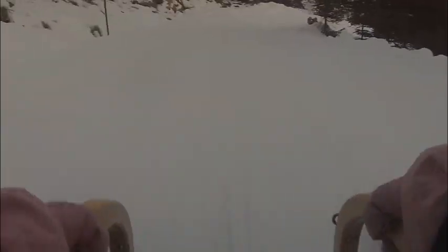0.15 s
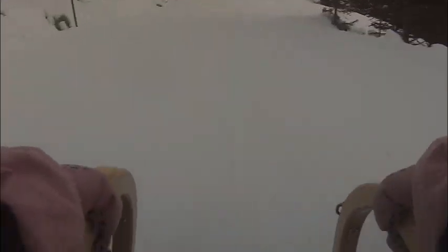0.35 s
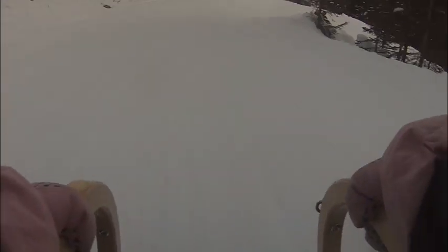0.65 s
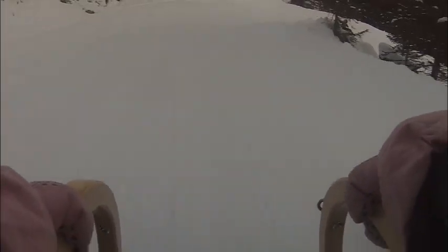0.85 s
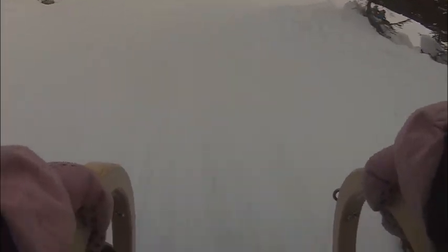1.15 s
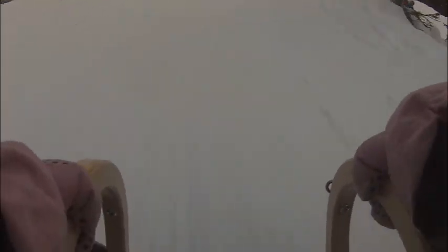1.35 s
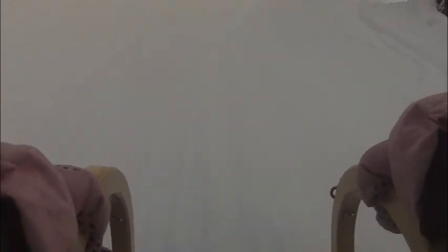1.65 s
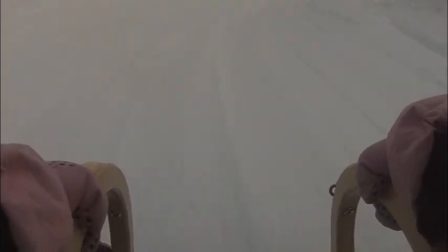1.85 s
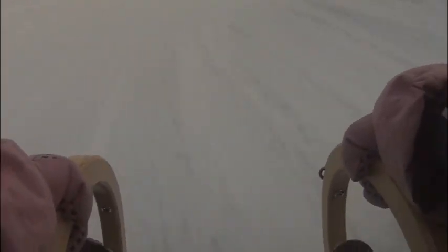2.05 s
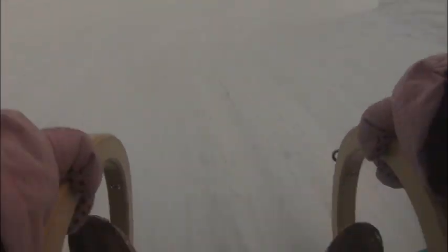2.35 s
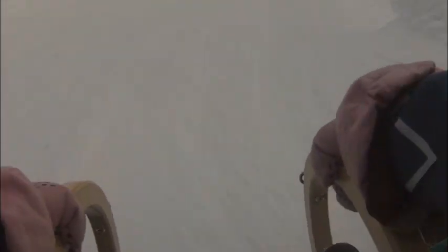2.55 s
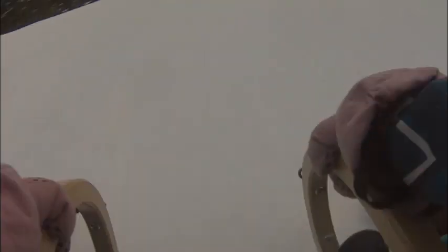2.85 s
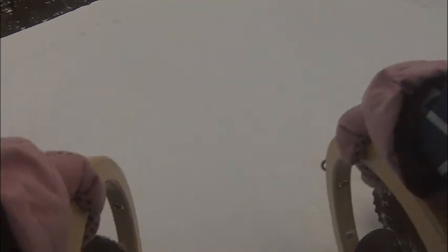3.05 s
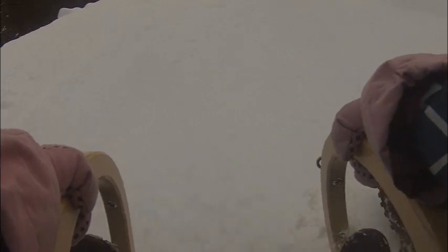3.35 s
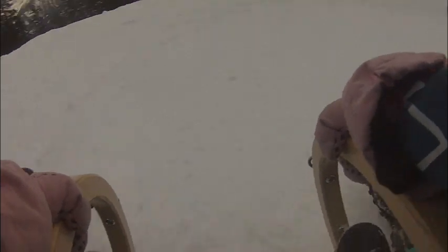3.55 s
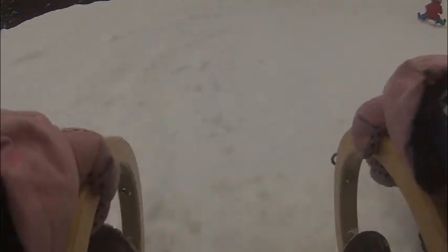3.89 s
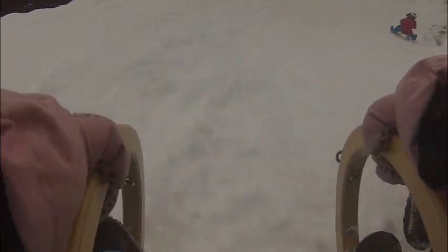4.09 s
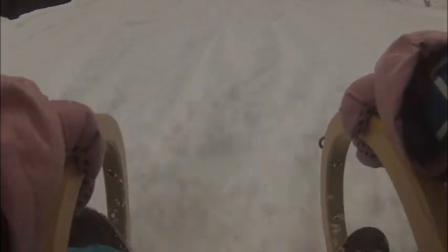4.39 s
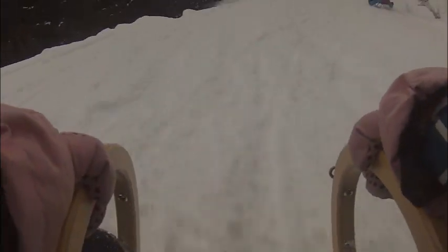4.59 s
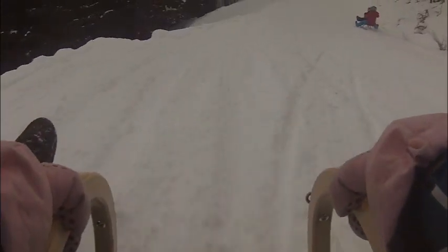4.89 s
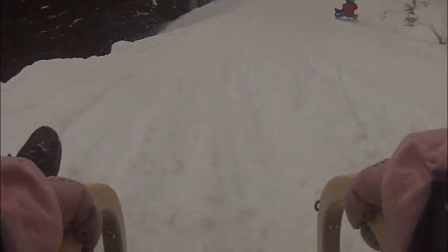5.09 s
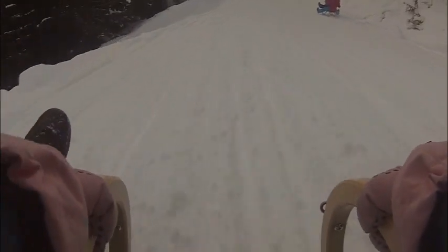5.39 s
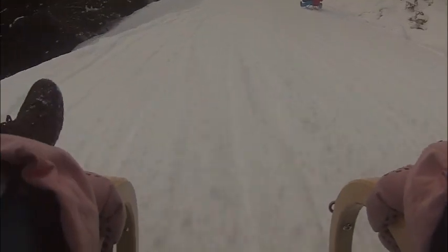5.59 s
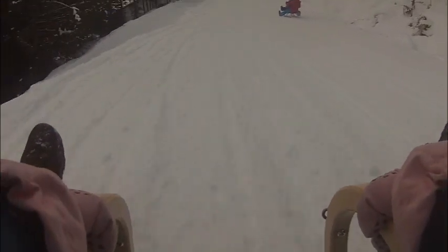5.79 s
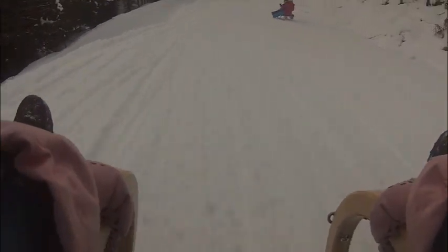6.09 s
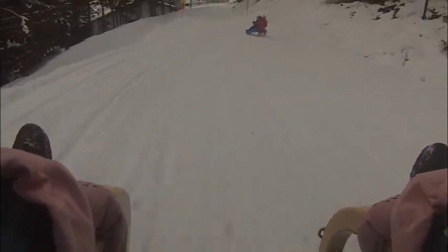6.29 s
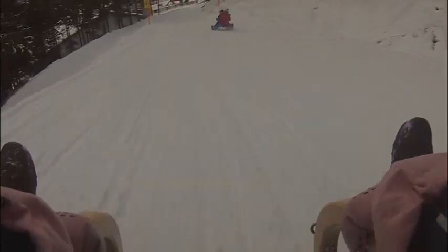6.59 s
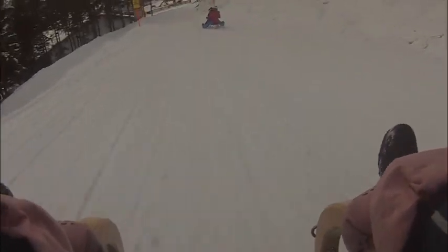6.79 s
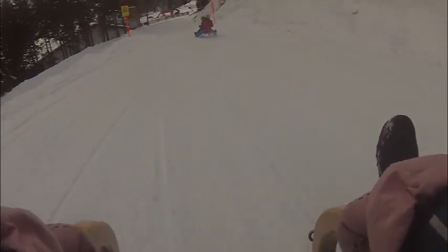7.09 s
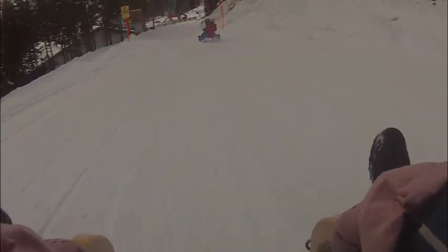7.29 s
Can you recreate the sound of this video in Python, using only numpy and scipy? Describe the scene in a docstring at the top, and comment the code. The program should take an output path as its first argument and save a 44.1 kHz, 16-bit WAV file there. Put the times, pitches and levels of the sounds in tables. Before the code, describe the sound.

Sled runners scrape over firm snow with thumps, short skids and crumbs ticking on a camera case, over low wind buffeting and rumble.

```python
"""On a packed-snow slope, a wooden sled runs downhill with a cased camera and its microphone riding on it.
The runners hiss and grind as filtered noise and breaking grains, harder through a turn, with short skids.
Bumps thump the frame as decaying swings and knock the camera mount; the wood clacks softly.
Crumbs of snow tick on the case as short blows; its resonances colour everything.
Behind them lie the frame's rumble, gusty wind on the microphone and a thin hiss of the microphone."""
import sys
import numpy as np
from scipy import signal
from scipy.fft import rfft, irfft, next_fast_len
from scipy.io import wavfile
from scipy.ndimage import uniform_filter1d, map_coordinates

SR = 44100
rng = np.random.default_rng(int(sys.argv[2]) if len(sys.argv) > 2 else 0)


def waveform_to_disk(signal):
    """Save audio, clipped to [-1, 1], as 16-bit WAV at the path in sys.argv[1]."""
    frames = np.transpose(np.atleast_2d(signal))
    scaled = np.clip(frames, -1, 1) * 32767
    samples = np.round(scaled).astype(np.int16)
    wavfile.write(sys.argv[1], SR, samples)


N = 328104


def amp(db):
    """Decibels to gain."""
    return 10 ** (np.asarray(db) / 20)


def unit(x):
    """Scale to rms 1."""
    return x / np.sqrt(np.mean(x ** 2) + 1e-20)


def clock():
    """Time of every sample, in seconds."""
    return np.arange(N) / SR


def curves(rows):
    """One value per sample for each column after the time."""
    times, *columns = np.transpose(rows)
    return [np.interp(clock(), times, column) for column in columns]


def wobble(rate):
    """A smooth random curve, rate knots a second."""
    knots = rng.standard_normal(int(N * rate / SR) + 4)
    return map_coordinates(knots, [np.arange(N) * rate / SR])


def add(track, start_s, sound):
    """Mix a sound into the track at its start time."""
    room = track[max(0, round(start_s * SR)):][:len(sound)]
    room += sound[:len(room)]


# resonances and notches of the camera case: centre_hz, width_hz, lift_db
CASE_MODES = [(708, 91, 3), (1100, 720, 1.5), (1515, 165, 5.5), (1674, 51, -9), (2050, 480, 2.5),
              (2250, 214, 2.5), (2635, 430, 2), (3770, 150, -4), (4240, 160, 4), (5500, 1140, 7.5),
              (8250, 570, -3.5), (9840, 600, 2.5)]


def response(spectrum, size=16384):
    """Minimum-phase impulse response, peak 1, of a source spectrum heard through the case."""
    hz = np.fft.rfftfreq(size, 1 / SR)
    freq_hz, level_db = np.transpose(spectrum)
    db = np.interp(np.log(hz + 1), np.log(freq_hz + 1), level_db)
    for centre, width, lift in CASE_MODES:
        db = db + lift / (1 + (2 * (hz - centre) / width) ** 2)
    # fold the cepstrum forward in time, so nothing sounds before its cause
    cepstrum = irfft(np.log(amp(db)))
    cepstrum[1:size // 2] *= 2
    cepstrum[size // 2 + 1:] = 0
    impulse = irfft(np.exp(rfft(cepstrum)))
    return impulse / np.abs(impulse).max()


def through(x, spectrum):
    """Colour an excitation with a source spectrum and the case."""
    return signal.fftconvolve(x, response(spectrum))[:N]


def case_ring(x, share, t60):
    """The case and its mount ring on faintly in many close modes: a decaying noise tail."""
    t = np.arange(SR // 8) / SR
    decay = amp(-60 * t / t60) * (1 - np.exp(-t / 0.001))
    tail = rng.standard_normal(len(t)) * decay
    return x + share * signal.fftconvolve(x, tail / np.linalg.norm(tail))[:N]


def crunch(rate, spread_db):
    """Snow grains breaking, rate a second, of widely scattered size; rms 1."""
    breaks = rng.random(N) < rate / SR
    sizes = rng.standard_normal(N) * amp(spread_db * rng.standard_normal(N))
    return unit(breaks * sizes)


def patchy(x, depth_db):
    """Let the colour shimmer in patches about 170 Hz wide and 35 ms long."""
    z = signal.stft(x, nperseg=1024)[2]
    field = uniform_filter1d(rng.standard_normal(z.shape), size=4, axis=0)
    field = uniform_filter1d(field, size=3, axis=1)
    return signal.istft(z * amp(depth_db * unit(field)), nperseg=1024)[1][:N]


def contacts(events, spectrum, chatter, t60, rise_s):
    """Sharp blows, each followed by a short chatter of the touching surfaces."""
    force, t = np.zeros(N), np.arange(SR // 20) / SR
    envelope = amp(-60 * t / t60) * (1 - np.exp(-t / rise_s))
    for start_s, db in events:
        blow = chatter * rng.standard_normal(len(t)) * envelope
        blow[0] += 1
        add(force, start_s, amp(db) * blow)
    return through(force, spectrum)


# brief dips in the hiss: start_s (the middle of each dip)
HISS_DIPS = [.814, 1.071, 4.67, 4.76, 5.003, 5.11, 5.405, 5.503, 5.705, 5.88, 6.228, 6.256, 6.575]
DIP_DB, DIP_HALF_S = 9, 0.01


def dips():
    """Depth in dB of the brief, flat-bottomed dips in the hiss."""
    t = clock()
    return DIP_DB * sum(np.exp(-((t - s) / DIP_HALF_S) ** 4) for s in HISS_DIPS)


# how hard the runners bite: start_s, grind_db, spray_db (both before the trims below)
RUNNER_BITE = [(0.0, -45, -55.5), (0.14, -52, -60), (0.85, -54.5, -60.5), (1.14, -53, -61),
               (1.95, -51.5, -55), (2.15, -45, -49), (2.61, -50, -59), (2.78, -43.5, -47),
               (2.92, -41.5, -48.5), (3.44, -47, -49), (3.75, -47.5, -51.5), (4.08, -52.5, -55),
               (4.41, -50.5, -56), (4.81, -59.5, -61), (5.06, -58.5, -62.5), (5.34, -50, -59),
               (5.78, -61.5, -64), (6.07, -58.5, -60.5), (6.32, -56, -62), (7.44, -58.5, -66)]
# colour of the grinding, before the case: freq_hz, level_db (relative)
GRIND_COLOUR = [(100, -13.5), (290, 2), (420, -4), (600, -6.5), (1100, -7.5), (2100, 2.5), (3000, -2),
                (3600, -16), (5000, -15.5), (9000, -25), (16000, -53)]
# colour of the fine spray, before the case: freq_hz, level_db (relative)
SPRAY_COLOUR = [(1000, -47), (3000, 2), (4500, 0.5), (6500, -2.5), (8200, -3), (10500, -6.5), (13000, -13),
                (15500, -20.5)]
GRIND_TRIM_DB, SPRAY_TRIM_DB = 0.5, 0.5
SKID_SPRAY_DB = 2  # a skid throws up this much more spray


def runners():
    """The runners crush grains and throw a fine spray; their pressure flutters with the uneven snow."""
    grind_db, spray_db = curves(RUNNER_BITE)
    t = clock()
    skidding = sum(np.exp(-((t - s) / half_s) ** 2) for s, _, half_s in SKIDS)
    pressure_db = 0.95 * wobble(18) + 0.76 * wobble(70)

    grains = rng.standard_normal(N) + 0.8 * crunch(rate=1500, spread_db=3.5)
    grains = grains * amp(pressure_db + 1.14 * wobble(45))
    grind = unit(through(patchy(grains, depth_db=2.5), GRIND_COLOUR))
    grind = case_ring(amp(grind_db + GRIND_TRIM_DB) * grind, share=0.31, t60=0.096)

    crystals = rng.standard_normal(N) + 0.45 * crunch(rate=3000, spread_db=3.5)
    powder = crystals * amp(pressure_db + 0.81 * wobble(25))
    spray = unit(through(patchy(powder, depth_db=3.0), SPRAY_COLOUR))
    spray = amp(spray_db + SPRAY_TRIM_DB + SKID_SPRAY_DB * skidding) * spray

    dip_db = dips()
    return grind * amp(-0.35 * dip_db) + spray * amp(-dip_db)  # the grinding dips less


# colour of the churned snow, before the case: freq_hz, level_db (relative)
PLOUGH_COLOUR = [(100, -18.5), (250, -2), (420, -1), (600, -5), (950, -7.5), (1200, -16.5), (3000, -31.5)]
PLOUGH_DB = -5  # against the untrimmed spray


def ploughing():
    """Cutting deeper, the runners churn the snow aside: a dull rush that rises with the spray."""
    _, spray_db = curves(RUNNER_BITE)
    rush_db = spray_db + PLOUGH_DB + 2.6 * wobble(30) - dips()
    return amp(rush_db) * unit(through(rng.standard_normal(N), PLOUGH_COLOUR))


# the runners skid over rough patches: start_s (the middle), level_db (before the ring), half_length_s
SKIDS = [(0.27, -54, 0.093), (0.458, -49, 0.03), (1.978, -46.5, 0.036), (2.4, -43, 0.036),
         (2.753, -37, 0.0067), (3.657, -43.5, 0.044), (3.898, -46, .04), (5.317, -46.5, 0.019),
         (5.457, -43, 0.043), (5.753, -54.5, 0.1), (6.131, -51, 0.05), (6.444, -48, 0.013),
         (6.602, -48, 0.016), (6.977, -49, 0.07)]
# colour of snow hitting or scraping, before the case: freq_hz, level_db (relative)
TICK_COLOUR = [(200, -8), (1000, -14.5), (1700, 0), (2300, 9), (3200, -7.5), (4500, -15), (8500, -20),
               (12500, -24.5), (15000, -31)]


def scrapes():
    """A skid is a short swell of coarser grains, ringing on in the case."""
    t = clock()
    swell = sum(amp(db) * np.exp(-((t - s) / half_s) ** 2) for s, db, half_s in SKIDS)
    grains = unit(through(crunch(rate=3400, spread_db=5.5), TICK_COLOUR))
    return case_ring(swell * grains, share=0.25, t60=0.1)


# bumps in the track: start_s, thump_db (before the attack), pitch_hz, knock_db (before the mount's level)
TRACK_BUMPS = [(0.045, -22, 87, -45), (0.087, -26.5, 153, -45), (.114, -21, 123, -27), (.224, -28, 67, -38),
               (2.499, -23, 140, -44), (2.638, -18.5, 142.4, -26), (2.846, -24, 113, -39),
               (2.9187, -11, 92.5, -5), (2.942, -16, 110, -42), (2.961, -4, 125, -2),
               (2.9733, -11, 201, -26), (3.083, -18, 125, -9.5), (3.2243, -23.5, 194, -22.5),
               (3.631, -20, 105, -42), (3.801, -28, 169, -40), (3.887, -18.5, 140, -28),
               (3.919, -17, 88, -38), (3.958, -18.5, 229, -19.5), (4.121, -24, 87, -40),
               (4.2929, -23.5, 206, -26.5), (4.402, -26, 73.4, -42), (5.371, -32, 148, -45)]
# colour of the shaken frame, before the case: freq_hz, level_db (relative)
FRAME_COLOUR = [(30, -17), (70, 4.5), (115, 8), (180, -12), (250, -6), (380, -19), (700, -32.5),
                (2000, -45)]
SWING_CYCLES, THUMP_ATTACK_S = 7.1, 0.0015  # a thump dies away (60 dB) in this many cycles
OVERTONE, OVERTONE_DB = 1.845, -12.5  # the frame's second mode, relative to its first


def bumps():
    """Each bump sets the loaded frame swinging for a few cycles, with a dull shudder."""
    track, t = np.zeros(N), np.arange(SR // 4) / SR
    attack = 1 - np.exp(-t / THUMP_ATTACK_S)
    for start_s, db, hz, _ in TRACK_BUMPS:
        shudder = unit(through(rng.standard_normal(len(t)), FRAME_COLOUR)[:len(t)])
        phase = 2 * np.pi * hz * t
        swing = -np.sin(phase) - amp(OVERTONE_DB) * np.sin(OVERTONE * phase) + 0.34 * shudder
        decay = amp(db - 60 * hz * t / SWING_CYCLES)
        add(track, start_s, decay * attack * swing)
    return track


# colour of the knocked mount, before the case: freq_hz, level_db (relative)
KNOCK_COLOUR = [(100, 5), (270, 20), (420, -22), (750, -20.5), (1150, -0.5), (1550, -4.5), (1980, 4),
                (2550, -5), (3000, -8), (3800, -23.5), (7000, -33.5), (15000, -46)]
MOUNT_DB = -5
REBOUND_S, REBOUND_DB = 0.00202, -5.5  # delay and relative level of the rebound


def mount_knocks():
    """Each bump knocks the camera mount, which strikes back once and rings on."""
    blows = []
    for start_s, _, _, db in TRACK_BUMPS:
        blows.append((start_s, db))
        blows.append((start_s + REBOUND_S, db + REBOUND_DB))
    mount = contacts(blows, KNOCK_COLOUR, chatter=0.14, t60=0.014, rise_s=0.0013)
    return case_ring(amp(MOUNT_DB) * mount, share=0.083, t60=0.065)


# snow hits the case: start_s, level_db (before the hits' level), length_s (a spatter if over the gap)
SNOW_HITS = [(.209, -28, 0), (1.0606, -37, 0.004), (2.172, -26, 0.0049), (5.319, -23, 0.0026),
             (5.3355, -26, 0.0053), (5.4322, -19.5, 0.0044), (5.446, -19.5, 0.023), (6.2899, -22.5, 0),
             (6.457, -30.5, 0.0051), (6.620, -22, 0), (6.7643, -28.5, 0)]
HIT_DB = -4
CRUMB_GAP_S, CRUMB_SCATTER_S, CRUMB_SPREAD_DB = 0.0046, 0.0005, 1.2
STRAY_PER_S, STRAY_DB = 28, 8.5  # stray crumbs; level over the untrimmed grinding


def crumbs():
    """Start (s) and level (dB) of every crumb: a spatter is a quick, uneven run of them."""
    hits = []
    for start_s, db, length_s in SNOW_HITS:
        hits.append((start_s, db))
        for lag in np.arange(CRUMB_GAP_S, length_s, CRUMB_GAP_S):
            hit_s = start_s + lag + CRUMB_SCATTER_S * rng.standard_normal()
            hits.append((hit_s, db + CRUMB_SPREAD_DB * rng.standard_normal()))
    return hits


def stray_crumbs():
    """Small crumbs fly up at random, louder the harder the runners grind."""
    grind_db, _ = curves(RUNNER_BITE)
    strikes = rng.random(N) < STRAY_PER_S / SR
    return through(strikes * amp(grind_db + STRAY_DB), TICK_COLOUR)


def case_ticks():
    """Spattered and stray crumbs strike the case, which rings on faintly."""
    hits = contacts(crumbs(), TICK_COLOUR, chatter=0.2, t60=0.015, rise_s=0.0012)
    return case_ring(amp(HIT_DB) * hits + stray_crumbs(), share=0.15, t60=0.18)


# the wooden frame clacks softly: start_s
WOOD_CLACKS = [.377, 6.882, 7.054, 7.231, 7.380]
# colour of the clacking wood, before the case: freq_hz, level_db (relative)
CLACK_COLOUR = [(150, -46), (450, -3), (800, 7.5), (1200, -2), (2000, -1.5), (4000, -26), (15000, -45)]
CLACK_DB = -41.5


def frame_clacks():
    """Parts of the wooden frame touch: one sharp, equally soft blow each time."""
    blows = [(start_s, CLACK_DB) for start_s in WOOD_CLACKS]
    return contacts(blows, CLACK_COLOUR, chatter=0.088, t60=0.022, rise_s=0.001)


# roughness of the track: start_s, rumble_db (before the trim)
TRACK_RUTS = [(0.0, -38), (0.29, -54.5), (1.01, -54), (1.76, -56), (2.71, -44), (2.94, -35), (3.34, -55),
              (3.83, -48.5), (4.91, -60), (5.26, -55.5), (6.36, -59), (7.44, -56)]
RUMBLE_TRIM_DB = 3.5


def frame_rumble():
    """Small ruts shake the frame: unevenly swelling noise in the frame's colour."""
    rumble_db, = curves(TRACK_RUTS)
    shaking = rng.standard_normal(N) * amp(4.6 * wobble(22))
    return amp(rumble_db + RUMBLE_TRIM_DB) * unit(through(shaking, FRAME_COLOUR))


# wind on the microphone: start_s, wind_db (before trim and gusts)
WIND_LEVEL = [(0.0, -39.5), (0.87, -46), (2.22, -44), (2.92, -35.5), (4.18, -40), (5.2, -53), (7.44, -43)]
# the strongest gusts: start_s (the middle of each)
STRONG_GUSTS = [.26, .7, 1.19, 2.22, 6.39, 7.04]
# colour of the buffeting, before the case: freq_hz, level_db (relative)
BUFFET_COLOUR = [(5, -9.5), (14, -3.5), (24, -6), (40, -11.5), (65, -26.5), (120, -29), (300, -45),
                 (1000, -73)]
BUFFET_TRIM_DB, GUST_DB, GUSTS_PER_S = 6.5, 1.5, 8.6  # trim, depth and pace of the gusts
GUST_LIFT_DB, GUST_HALF_S = 10, 0.04  # the strongest gusts


def wind():
    """Gusty eddies push on the microphone: low noise whose level wanders and briefly surges."""
    wind_db, = curves(WIND_LEVEL)
    t = clock()
    gusting = sum(np.exp(-((t - s) / GUST_HALF_S) ** 2) for s in STRONG_GUSTS)
    buffet_db = wind_db + BUFFET_TRIM_DB + GUST_LIFT_DB * gusting + GUST_DB * wobble(GUSTS_PER_S)
    return amp(buffet_db) * unit(through(rng.standard_normal(N), BUFFET_COLOUR))


# colour of the microphone's hiss, before the case colouring: freq_hz, level_db (relative)
HISS_COLOUR = [(500, -8), (3000, -26), (8000, -1), (15500, -3)]
HISS_DB = -74  # outside the dips


def microphone_hiss():
    """Thin hiss of the microphone: filtered noise, level except for the brief dips."""
    return amp(HISS_DB - dips()) * unit(through(rng.standard_normal(N), HISS_COLOUR))


def scene():
    """Sliding, blows and wind at one microphone."""
    sliding = runners() + ploughing() + scrapes()
    blows = bumps() + mount_knocks() + case_ticks() + frame_clacks()
    background = frame_rumble() + wind() + microphone_hiss()
    return (sliding + blows + background)[None]


TOP_HZ = 15400


def record(dry):
    """The camera keeps nothing above its band limit."""
    size = next_fast_len(N + SR // 2)
    kept = np.fft.rfftfreq(size, 1 / SR) < TOP_HZ
    return irfft(rfft(dry, size) * kept, size)[..., :N]


dry = scene()
out = record(dry)
waveform_to_disk(out)
```